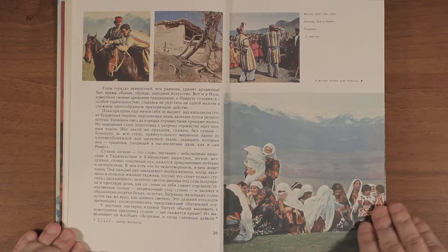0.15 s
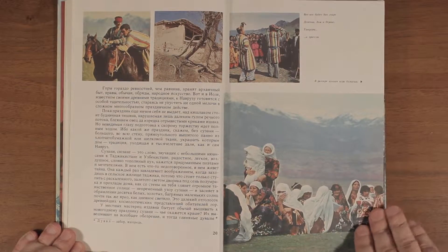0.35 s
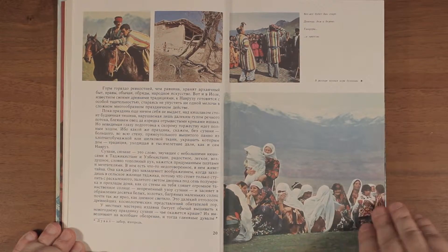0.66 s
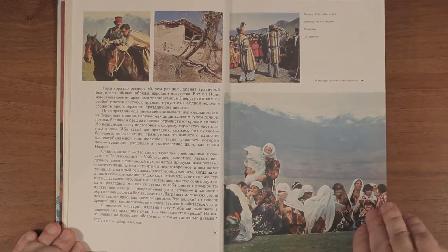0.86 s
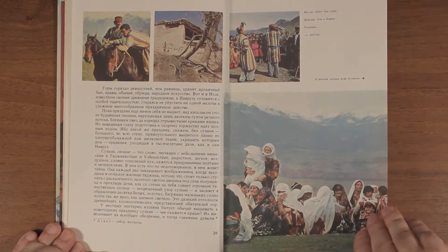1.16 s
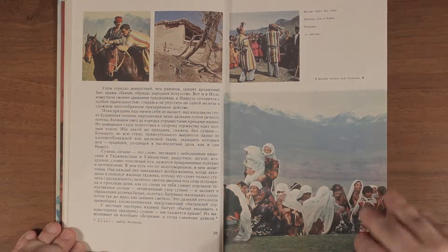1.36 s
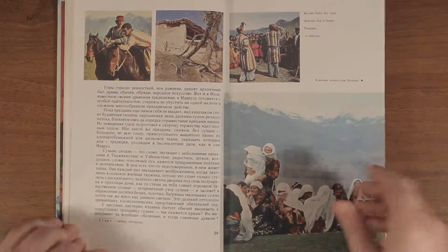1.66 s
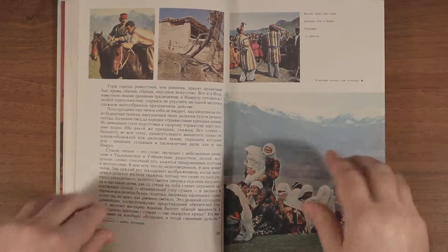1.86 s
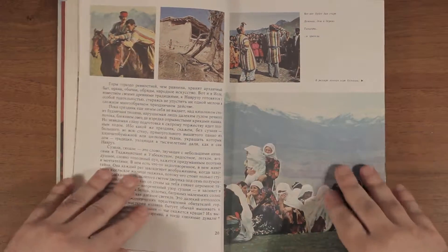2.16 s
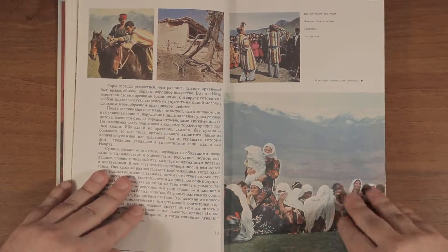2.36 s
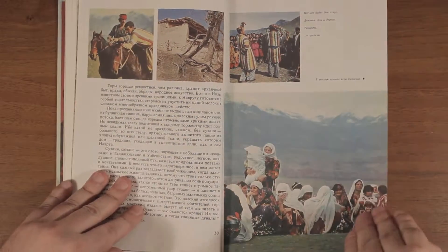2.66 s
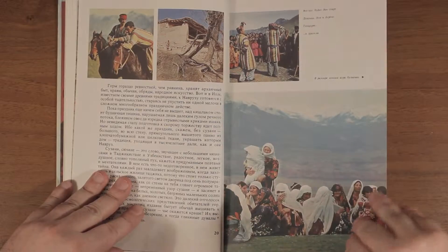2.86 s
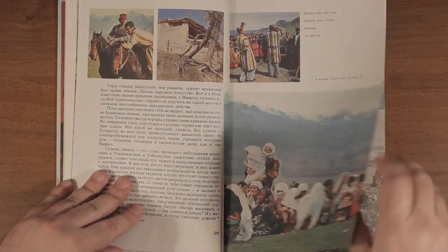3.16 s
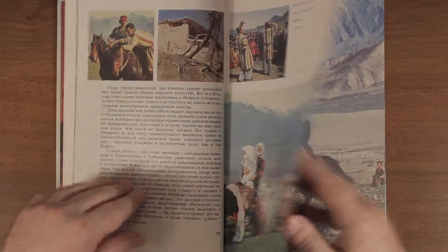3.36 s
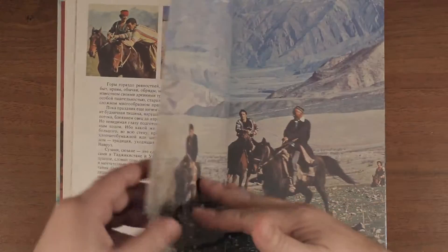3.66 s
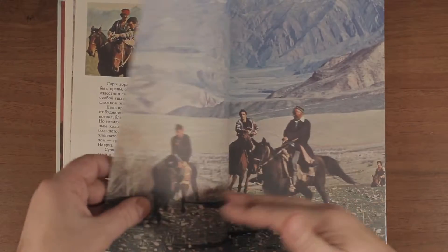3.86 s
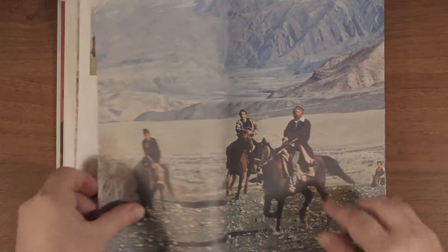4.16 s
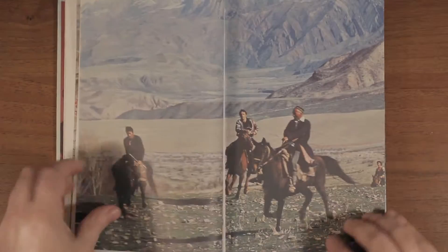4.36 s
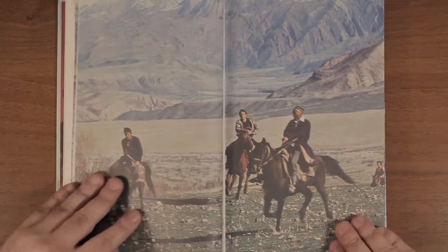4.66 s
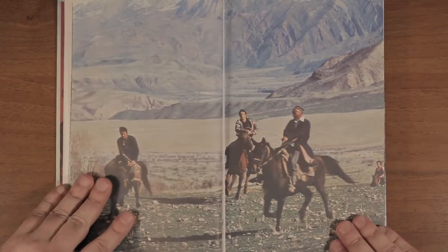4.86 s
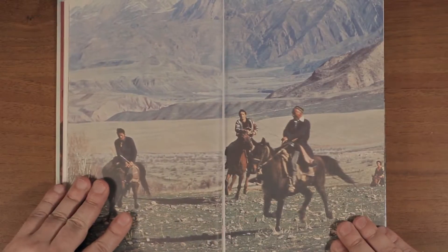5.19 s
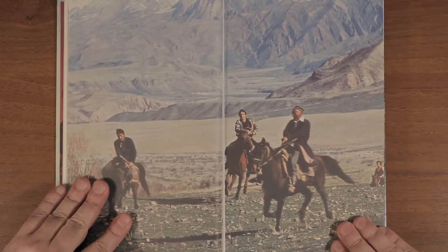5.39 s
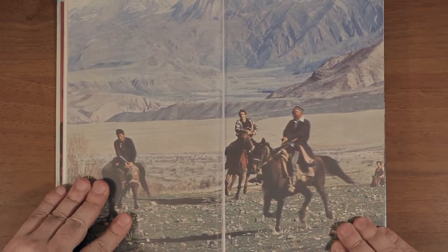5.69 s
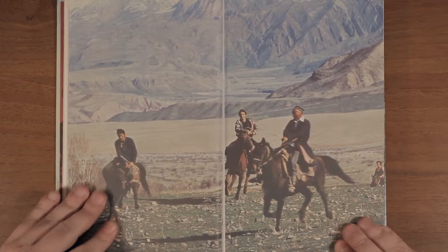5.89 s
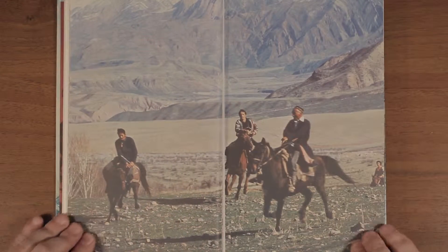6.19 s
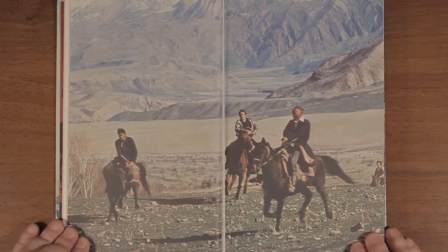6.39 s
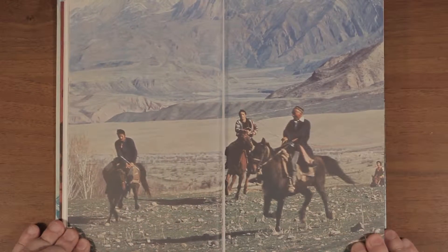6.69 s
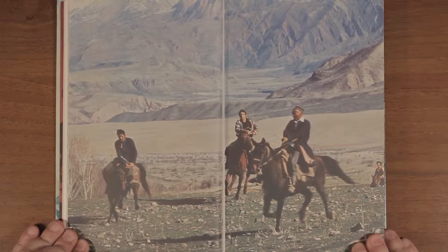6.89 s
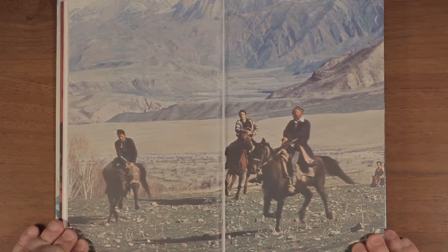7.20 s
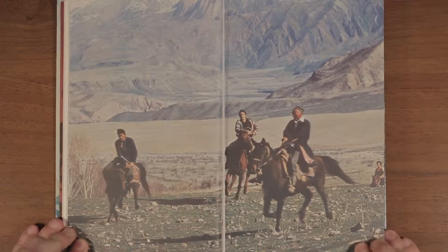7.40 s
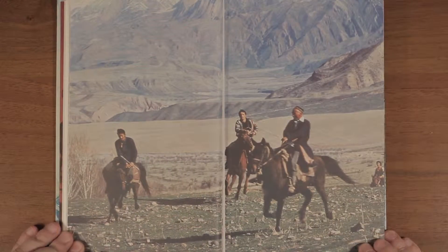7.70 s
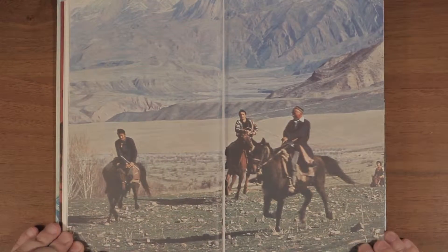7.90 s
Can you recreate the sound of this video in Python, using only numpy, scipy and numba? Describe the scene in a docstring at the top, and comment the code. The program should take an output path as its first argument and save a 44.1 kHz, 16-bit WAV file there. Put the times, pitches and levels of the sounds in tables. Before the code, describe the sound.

Hands handle a large glossy book on a wooden table, heard close in a small quiet room with a faint steady hiss. After light scuffs, a page corner buckles in a quick run of crisp snaps from about 1 to 1.3 seconds. A papery swish and a soft thump follow at 1.5, then faint rubbing. Near 2.8 seconds comes the loudest snap, with a short rasp, and the page swishes over until about 3.7, with a few dull finger bumps. It lands with sharp crackles between 3.9 and 4.2 and slides flat with a bright, slightly hollow hiss until 4.8. Small fingertip creaks come around 5 seconds, another crisp snap at 5.3, then soft thumps and a short stutter of creaks near 5.8. From 6 to 8 seconds only faint brushing, an occasional creak and light dull taps on the book and table remain.

```python
"""Crisp page snaps and papery swishes: hands leaf through a large glossy book on a wooden table.
Corners buckle and snap off a thumb, rubbed sheets ring in their bending modes, and skin scuffs,
creaks and hisses on the coated paper. Fingers and cover thump the book and table top.
A small, quiet room rings briefly after the snaps, over the steady hiss of room and microphone."""
import sys
import numpy as np
from scipy import signal
from scipy.fft import rfft, irfft
from scipy.io import wavfile
from scipy.ndimage import uniform_filter1d
from numba import njit

SR = 44100
rng = np.random.default_rng(int(sys.argv[2]) if len(sys.argv) > 2 else 0)


def wav_out(sig):
    """Save sig, one row per channel (or a flat mono array), as 16-bit PCM at SR to the path in sys.argv[1]."""
    wavfile.write(sys.argv[1], SR, np.round(np.clip(np.atleast_2d(sig).T, -1, 1) * 32767).astype(np.int16))


N = 354652

# Thin, high rings on the edge of a snap: (pitch ratio, level [dB], Q)
EDGE_RINGS = [(1, 4, 1.55), (2.3, -2, 1.4)]
# Page snaps: (time [s], peak [dB], pitch [Hz], edge vs body [dB], edge pitch [Hz],
# rattle vs peak [dB], rattle length factor)
SNAPS = [(1.0503, -31, 1790, -11.5, 5240, -10.5, 0.44), (1.1110, -18.5, 1490, -9, 5100, -19.5, 0.48),
         (1.1847, -20.5, 1520, -11, 5240, -14, 0.24), (1.2336, -20.5, 1640, -11, 5340, -19.5, 0.36),
         (1.288, -25.5, 1350, -10, 5300, -13.5, 0.19), (1.2966, -25, 980, -12, 4900, -30, 0.27),
         (2.108, -40, 840, 0.5, 5030, -6.5, 0.19), (2.7742, -16, 1530, -10, 5050, -19.5, 0.42),
         (2.8164, -21.5, 1300, -15.5, 5770, -16, 0.38), (2.863, -28, 1500, -11, 5930, -17, 0.5),
         (3.406, -52, 1150, -30, 4880, -1, 0.4), (3.8653, -28.5, 1170, -13, 4200, -20.5, 0.63),
         (4.068, -33.5, 1770, 6, 4500, -15.5, 0.95), (4.0736, -29, 1570, -3, 4560, -20, 0.53),
         (4.116, -39, 1300, -1, 4800, -34, 0.37), (4.119, -31.5, 1220, 5, 4500, -15, 0.19),
         (4.1743, -28, 1170, 9, 4800, -14.5, 0.44), (5.109, -38, 3200, -9, 12500, -9.5, 0.35),
         (5.2685, -27, 1830, -4.5, 6100, -11.5, 0.4), (5.2692, -30.5, 2370, 8, 12900, -13, 0.51)]
def page_snaps():
    """Paper buckles and flips: one pressure cycle with a crisp edge, then a brighter rattle."""
    out = np.zeros(N)
    noises = rng.standard_normal((len(SNAPS), 9000))
    kick = np.eye(1, 256, 36)[0]  # a single impulse
    for (start, db, hz, edge_db, edge_hz, rattle_db, length), noise in zip(SNAPS, noises):
        edge = sum(undb(ring_db) * band_twice(kick, ratio * edge_hz, q, q) / ratio
                   for ratio, ring_db, q in EDGE_RINGS)
        edge = edge / edge.max()
        lowpass = signal.butter(4, 1.9 * hz, fs=SR, output="sos")
        body = signal.sosfilt(lowpass, band(kick, 1.15 * hz, q=.95))
        snap = unit_peak(body) + undb(edge_db) * edge
        tint = snap + 2 * undb(min(edge_db, 0)) * edge  # extra edge brightens the tail
        tail = signal.fftconvolve(rattle(noise, length), tint) / np.sqrt(np.sum(tint ** 2))
        add(out, start, undb(db) * unit_peak(snap))
        add(out, start, undb(db + rattle_db) * tail)
    return out


# Bands of the rattling tail: (centre [Hz], t60 at length factor 1 [s])
RATTLE_BANDS = [(250, 1), (500, 0.38), (1000, 0.21), (2000, 0.048), (4000, 0.062), (8000, 0.05),
                (13000, 0.052)]
def rattle(noise, length):
    """The sheet and the near room keep trembling after a blow; the lows last longest."""
    t = np.arange(len(noise)) / SR
    attack = 1 - np.exp(-t / .002)
    return attack * sum(band(noise, hz, q=.63) * decay(t, t60 * length) for hz, t60 in RATTLE_BANDS)


# Swishes of hand and paper: (full at [s], rise [s], hold [s], fall [s], sheet level [dB],
# hiss level [dB], centre set by the curl [Hz])
STROKES = [(0.507, 0.15, 0.22, 0.24, -69, -70, 2150), (0.875, 0.025, 0.01, 0.071, -46.5, -84, 2820),
           (0.98, 0.16, 0.012, 0.073, -50.5, -74, 1840), (1.215, 0.044, 0.13, 0.071, -49.5, -77, 1350),
           (1.509, 0.11, 0.0092, 0.14, -42.5, -52, 2300), (1.608, 0.022, .005, 0.053, -42.5, -53, 2640),
           (1.73, 0.23, 0.075, 0.4, -65.5, -69.5, 1190), (2.125, 0.011, 0.2, 0.16, -61, -64.5, 1050),
           (2.331, 0.054, 0.0041, 0.022, -56, -65, 1100), (2.498, 0.17, .01, 0.081, -61, -60.5, 2510),
           (2.567, 0.11, .005, 0.02, -58, -63, 2210), (2.706, 0.053, .005, 0.074, -42, -71, 2400),
           (2.86, 0.15, 0.0019, 0.09, -46.5, -79, 1340), (2.951, 0.19, .005, 0.03, -51.5, -60.5, 1920),
           (3.014, 0.018, 0.026, 0.42, -52.5, -64, 1880), (3.093, 0.1, 0.061, 0.44, -48.5, -56.5, 2230),
           (3.408, 0.06, 0.0057, 0.16, -59, -56.5, 1300), (3.644, 0.0033, 0.0033, 0.14, -44.5, -61.5, 1130),
           (3.768, 0.049, 0.054, .1, -58.5, -63.5, 1650), (3.85, 0.011, 0.17, 0.05, -51, -55, 1670),
           (4.071, 0.0051, 0.016, 0.02, -46.5, -49, 1090), (4.117, 0.0068, 0.019, 0.038, -45, -49, 3480),
           (4.177, .005, 0.018, 0.14, -53, -51.5, 4000), (4.235, 0.15, 0.15, 0.15, -46.5, -55, 2480),
           (4.602, 0.14, 0.011, 0.046, -57, -53.5, 2220), (4.682, 0.1, 0.083, 0.048, -56, -55, 1510),
           (4.848, .015, 0.07, 0.45, -65, -70, 1230), (6.07, 0.3, 0.02, 0.1, -59.5, -59, 1230),
           (6.246, .08, .02, 0.33, -69, -66, 1540), (7.698, 0.71, .01, 0.59, -75, -72, 1520)]
def hand_strokes():
    """Strokes swell the sheet and hiss gains; the loudest stroke pulls the sheet's centre its way."""
    sheet_db, hiss_db, hz = np.transpose(STROKES)[4:]
    power = swells(STROKES)
    sheet_power = undb(2 * sheet_db) @ power
    hiss_power = undb(2 * hiss_db) @ power
    curl_hz = (hz * undb(2 * sheet_db)) @ power / sheet_power
    return np.sqrt(sheet_power), np.sqrt(hiss_power), curl_hz


# Bending modes of a page: (pitch [Hz], relative level [dB])
SHEET_MODES = [(600, -16), (800, 7), (1050, 14.5), (1400, 10), (1800, 7), (2300, 5), (3000, 8), (4000, 10),
               (5300, 8.5), (7000, -14), (9000, -8)]
def sheet_slide(gain, curl_hz):
    """Rubbing drives the sheet around a centre set by its curl; each bending mode flickers alone."""
    # The root evens out the power, which grows as a band-pass moves up.
    rub = band_twice(friction(), curl_hz, 1, .4) / np.sqrt(curl_hz)
    sheet = 0
    for hz, db in SHEET_MODES:
        flicker = undb(db + 2.2 * wander(22))
        wavering_hz = hz * (1 + .05 * wander(6))
        sheet += flicker * band(rub, wavering_hz, q=6)
    return gain * unit_rms(sheet)


# Modes of the plucked page stack: (pitch ratio, level [dB], t60 at length factor 1 [s])
STACK_MODES = [(1, 1, .05), (1.45, -2, .015), (2.0, -3, 0.022), (2.7, -12, .015), (3.8, -9, 0.015)]
# Fingertip creaks: (time [s], ring peak [dB], pitch [Hz], ring length factor, tick vs ring [dB])
CREAKS = [(1.213, -27.5, 1280, 0.82, -40), (1.323, -31.5, 1430, 0.13, -40), (2.232, -34, 930, 0.4, -25),
          (4.8405, -42.5, 1200, 0.21, -6), (4.86, -45, 740, .5, -6), (4.915, -46, 654, 0.45, -4),
          (4.966, -41.5, 1120, 0.24, -4), (4.9901, -36, 900, 0.16, -11), (5.7854, -34, 752, 0.86, -17),
          (5.804, -36.5, 804, 0.6, -28), (5.8223, -36, 745, 0.75, -9), (5.8407, -36.5, 773, 1.3, -18),
          (5.91, -49, 1165, 0.83, -20), (6.862, -38.5, 810, 1, -6), (7.444, -48.5, 686, 0.69, -28)]
def finger_creaks():
    """A fingertip sticks and lets go with a tick; the plucked stack rings and faintly rattles."""
    out = np.zeros(N)
    noises = rng.standard_normal((len(CREAKS), 5000))
    t = np.arange(noises.shape[1]) / SR
    for (start, db, hz, length, tick_db), noise in zip(CREAKS, noises):
        ring = sum(undb(mode_db) * np.sin(2 * np.pi * hz * ratio * t) * decay(t, t60 * length)
                   for ratio, mode_db, t60 in STACK_MODES)
        ring = -ring * (1 - np.exp(-t / .0004))
        tail = band_twice(rattle(noise, length=.59), hz, .75, .75)
        tick = band(noise[::-1] * np.exp(-t / .00091), hz=9000, q=1.1)
        cycles = hz * t - 6.5  # one soft low bump follows, 6.5 cycles later and an octave lower
        low_bump = np.cos(np.pi * cycles) * np.exp(-cycles ** 2 / 2)
        creak = unit_peak(ring) + undb(-8) * tail + undb(tick_db) * tick + undb(-6) * low_bump
        add(out, start, undb(db) * creak)
    return out


# Quick scuffs: (time [s], peak [dB], pitch near the peak [Hz], length [s])
SCUFFS = [(0.854, -42, 4800, 0.031), (0.948, -39.5, 2980, 0.008), (0.983, -34, 2880, 0.0076),
          (1.419, -43, 2050, 0.017), (1.615, -36, 3630, 0.0031), (2.664, -30.5, 3700, 0.036),
          (2.806, -37.5, 1390, 0.018), (2.838, -30.5, 1650, 0.016), (3.039, -45, 5240, 0.016),
          (3.644, -54, 1340, 0.03), (4.363, -31, 5950, 0.0036)]
SINK_OCTAVES_PER_S = 22.5
def edge_scuffs():
    """Skin rasps over a page edge, sinking in pitch as the free edge lengthens; short scuffs are broad."""
    out = np.zeros(N)
    noises = rng.standard_normal((len(SCUFFS), 11000))
    t = np.arange(noises.shape[1]) / SR
    for (start, db, hz, length), noise in zip(SCUFFS, noises):
        progress = t / length
        swell = (1 - np.exp(-(progress / .42) ** 2)) * np.exp(-progress)
        sinking_hz = hz * 2 ** (-SINK_OCTAVES_PER_S * length * np.minimum(progress - .6, 1.3))
        body = band_twice(noise, sinking_hz, 1 + 55 * length, 1.5)
        rasp = band_twice(noise, 1.6 * sinking_hz, 1.8, 1.8)
        add(out, start - .006, undb(db) * unit_peak(swell * (body + undb(-13) * rasp)))
    return out


# Fingers and cover landing: (time [s], ring peak [dB], hardness as centre of the push [Hz])
THUMPS = [(0.499, -58.5, 135), (1.477, -35, 650), (1.495, -31, 820), (2.24, -44, 537), (3.01, -40, 600),
          (3.036, -40, 605), (3.662, -38, 480), (3.941, -38.5, 557), (4.232, -44, 790), (5.288, -43, 820),
          (5.633, -32, 600), (5.666, -39, 476), (5.788, -48.5, 94), (5.925, -44, 158), (6.058, -42, 490),
          (6.158, -50, 394), (6.415, -56.5, 210), (6.74, -49.5, 320), (6.864, -45, 573),
          (6.864, -45.5, 193), (6.957, -52, 444), (7.307, -50.5, 340), (7.605, -45, 650), (7.655, -50, 560),
          (7.731, -47, 560), (7.799, -52.5, 150)]
def book_thumps():
    """A soft push with a crumbly settling rings the book and table, topped by a papery pat."""
    out = np.zeros(N)
    noises = rng.standard_normal((len(THUMPS), 14000))
    t = np.arange(noises.shape[1]) / SR
    attack = 1 - np.exp(-t / .0048)
    settling = np.exp(-t / .0036) + .49 * np.exp(-t / .021)
    for (start, db, hz), noise in zip(THUMPS, noises):
        push = noise * attack * settling
        ring = book_ring(band_twice(push, hz, .9, .6))
        pat = band_twice(push, 1.9 * hz, .89, .89)
        add(out, start, undb(db) * (unit_peak(ring) + undb(-11) * unit_peak(pat)))
    return out


# Woody modes of book and table: (pitch [Hz], gain [dB], t60 [s])
BOOK_MODES = [(66, 4, 0.14), (138, 0.5, 0.28), (148, 8.5, 0.049), (198.7, 2, 0.25), (237.4, -2.5, 0.16),
              (278, -0.5, 0.052), (347, 0.5, 0.063), (406, 4, 0.075), (488, 7, 0.038), (572, 3, 0.033),
              (676, 6, 0.018), (1200, -10, 0.026)]
def book_ring(force):
    """The book block and table top answer a force with damped resonances."""
    out = 0
    for hz, db, t60 in BOOK_MODES:
        pole = np.exp((2j * np.pi * hz - np.log(1000) / t60) / SR)
        out += undb(db) * signal.lfilter([1], [1, -pole], force).imag
    return out


# Automation of the settling page: (time [s], hollow pitch [Hz], hollow level [dB], sheen level [dB])
SETTLING_CURVE = [(3.868, 1280, -44, -80), (3.9, 1420, -58.5, -80), (4.01, 1480, -60, -80),
                  (4.06, 1020, -78, -78), (4.12, 976, -44, -70), (4.17, 1046, -56.5, -60),
                  (4.326, 1075, -56.5, -49), (4.352, 1024, -57, -49), (4.516, 1110, -68, -63.5),
                  (4.596, 1033, -51, -55), (4.636, 1030, -60, -71), (4.722, 1030, -54.5, -61),
                  (4.778, 1090, -73, -73), (4.82, 1090, -79, -91)]
SHEEN_HZ = 8560
def settling_page():
    """A page settles under the fingers: friction sings in two hollow resonances and a bright sheen."""
    t = np.arange(N) / SR
    times, pitches, *levels = np.transpose(SETTLING_CURVE)
    hz = np.interp(t, times, pitches)
    hollow_gain, sheen_gain = (undb(np.interp(t, times, db, left=-120, right=-120)) for db in levels)
    rub = friction()
    hollow = unit_rms(band_twice(rub, hz, 12, 7)) + undb(-5) * unit_rms(band_twice(rub, 1.4 * hz, 9, 6))
    sheen = band_twice(rub, SHEEN_HZ, 3, 2.5) + undb(-7) * band_twice(rub, 1.55 * SHEEN_HZ, 3, 3)
    return hollow_gain * hollow + sheen_gain * unit_rms(sheen)


# EQ of the glossy surface: (frequency [Hz], relative level [dB])
GLOSS_EQ = [(2500, -7), (4500, -4), (6500, -6.5), (9000, -6.5), (11000, -10), (13500, -9), (16000, -10)]
def gloss_hiss(gain):
    """Skin glides over coated paper with a bright, grainy hiss."""
    return gain * colour(friction(), GLOSS_EQ)


# Weight of the hands on the book: (full at [s], rise [s], hold [s], fall [s], level [dB])
LEANS = [(1.26, 0.13, 0.012, 0.27, -51), (1.495, 0.065, 0.19, 0.11, -58.5),
         (2.288, 0.24, 0.0088, 0.22, -71), (2.826, 0.15, 0.0064, 0.19, -49.5),
         (3.435, 0.34, 0.41, 0.1, -60), (3.992, 0.21, 0.14, 0.13, -52), (4.873, 1, 0.14, 0.64, -63),
         (5.91, 0.21, 0.011, 0.38, -52), (6.41, 1, 0.058, 0.72, -66.5), (7.313, 0.042, 0.099, 0.71, -60),
         (7.755, 0.17, 0.055, 0.058, -67)]
def leaning_hands():
    """Uneven friction under the leaning hands makes the book and table mutter."""
    grip = friction() * undb(2.5 * wander(30))
    mutter = unit_rms(book_ring(np.diff(grip, prepend=0)))
    lean_db = np.transpose(LEANS)[4]
    return np.sqrt(undb(2 * lean_db) @ swells(LEANS)) * mutter


# EQ of the room tone: (frequency [Hz], relative level [dB])
ROOM_EQ = [(12, -42), (20, -13), (65, -14.5), (86, -7.5), (158, -10.5), (204, -9), (255, -10.5), (377, -10),
           (897, -13.5), (1190, -14), (16000, -24.5)]
ROOM_DB = -63.5
def room_tone():
    """Steady hiss of room and microphone."""
    return undb(ROOM_DB) * colour(rng.standard_normal(N), ROOM_EQ)


def friction():
    """Countless tiny catches of uneven size, coming in patches."""
    catches = rng.standard_normal(N) * undb(1.2 * rng.exponential(size=N))
    return unit_rms(catches * undb(1.3 * wander(60)))


def swells(table, fade_db=20):
    """One power envelope a row: 1 during the hold, fade_db lower per rise or fall time away from it."""
    t = np.arange(N) / SR
    full_at, rise, hold, fall = np.transpose(table)[:4, :, None]
    away = np.maximum((full_at - t) / rise, (t - full_at - hold) / fall)
    return undb(-2 * fade_db * np.maximum(away, 0))


def wander(rate):
    """Glide between random values, rate of them a second; spread near 1."""
    step = int(SR / rate)
    return uniform_filter1d(np.repeat(rng.standard_normal(N // step + 1), step), step)[:N]


@njit
def svf(x, hz, q):
    """State-variable band-pass with a centre for every sample, gain 1 at the centre."""
    out = np.empty(len(x))
    band_state, low_state, damping = 0., 0., 1 / q
    for i in range(len(x)):
        g = np.tan(np.pi * hz[i] / SR)
        passed = (band_state + g * (x[i] + 1e-18 - low_state)) / (1 + g * (g + damping))
        band_state = 2 * passed - band_state
        low_state += 2 * g * passed
        out[i] = damping * passed
    return out


def band(x, hz, q):
    """Band-pass at a fixed or moving centre."""
    return svf(x, np.clip(hz + np.zeros(len(x)), 20., .45 * SR), float(q))


def band_twice(x, hz, first_q, second_q):
    """Two band-passes in series, for steeper skirts."""
    return band(band(x, hz, first_q), hz, second_q)


def colour(x, eq):
    """Shape a noise by (frequency [Hz], level [dB]) points, at rms 1."""
    hz, db = np.transpose(eq)
    bin_hz = np.maximum(np.fft.rfftfreq(len(x), 1 / SR), 1)
    gain = undb(np.interp(np.log(bin_hz), np.log(hz), db))
    return unit_rms(irfft(rfft(x) * gain, len(x)))


def decay(t, t60):
    """Fade by 60 dB every t60 seconds."""
    return 1000 ** (-t / t60)


def undb(db):
    """Decibels to gain."""
    return 10 ** (np.asarray(db) / 20)


def unit_rms(x):
    """Scale to rms 1."""
    return x / np.sqrt(np.mean(x ** 2))


def unit_peak(x):
    """Scale to peak 1."""
    return x / np.abs(x).max()


def add(out, start, x):
    """Mix x into out from start [s]."""
    i = int(start * SR)
    out[i:i + len(x)] += x[:N - i]


def scene():
    """Rubbing, page handling and room tone, mixed to mono."""
    sheet_gain, hiss_gain, curl_hz = hand_strokes()
    rubbing = sheet_slide(sheet_gain, curl_hz) + gloss_hiss(hiss_gain) + leaning_hands() + settling_page()
    handling = page_snaps() + finger_creaks() + edge_scuffs() + book_thumps()
    return (rubbing + handling + room_tone())[None]


def record(dry):
    """A steep high cut at 15.8 kHz and a small DC offset."""
    high_cut = signal.ellip(10, .2, 60, 15800, fs=SR, output="sos")
    return signal.sosfilt(high_cut, dry) + 0.0005


dry = scene()
out = record(dry)
wav_out(out)
```